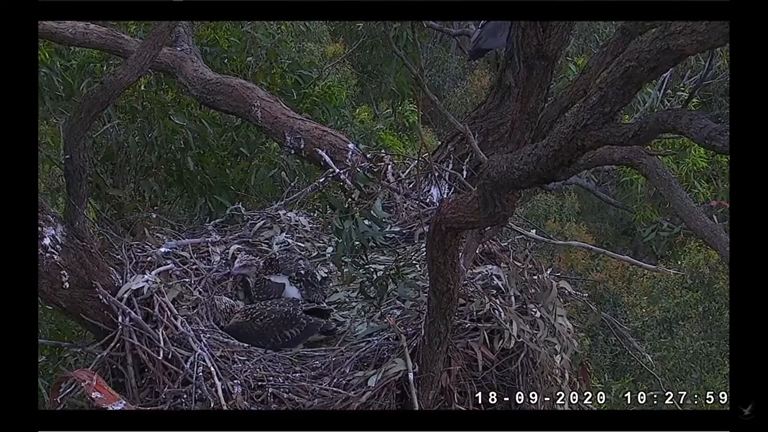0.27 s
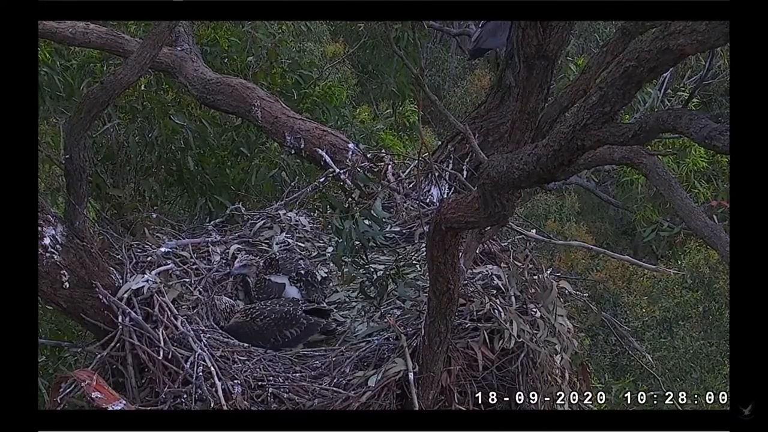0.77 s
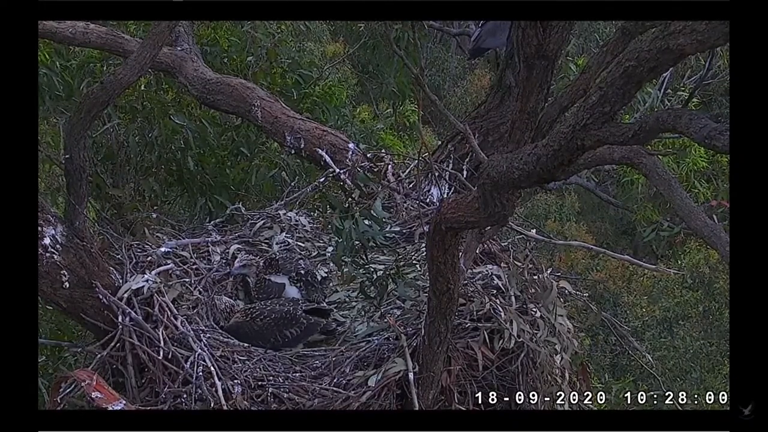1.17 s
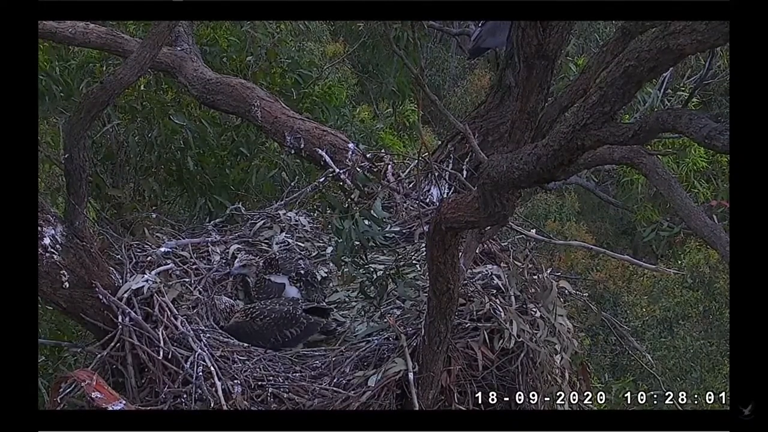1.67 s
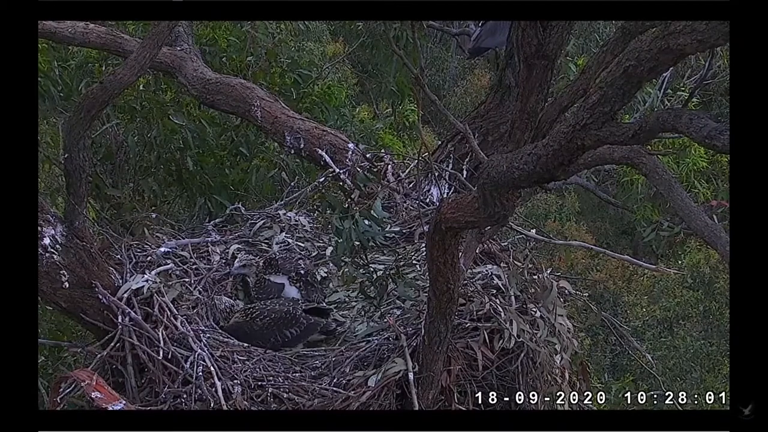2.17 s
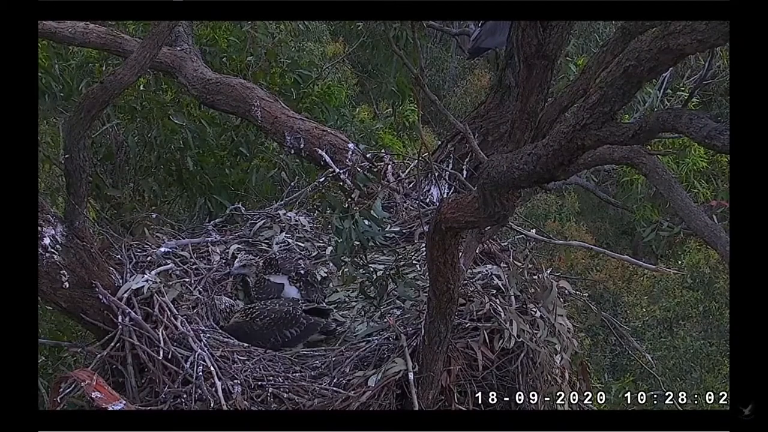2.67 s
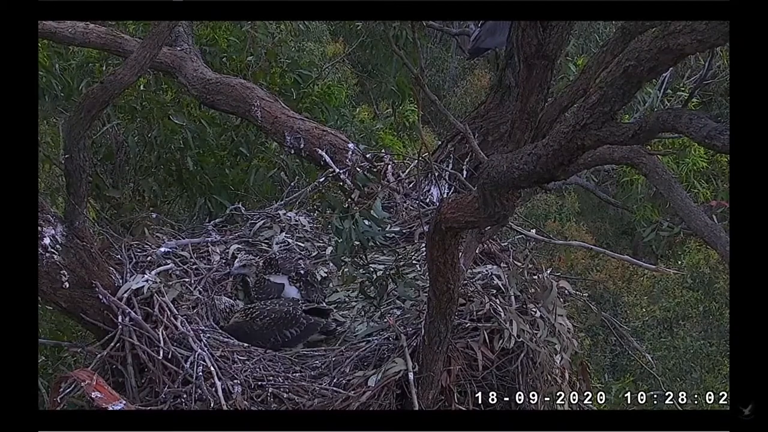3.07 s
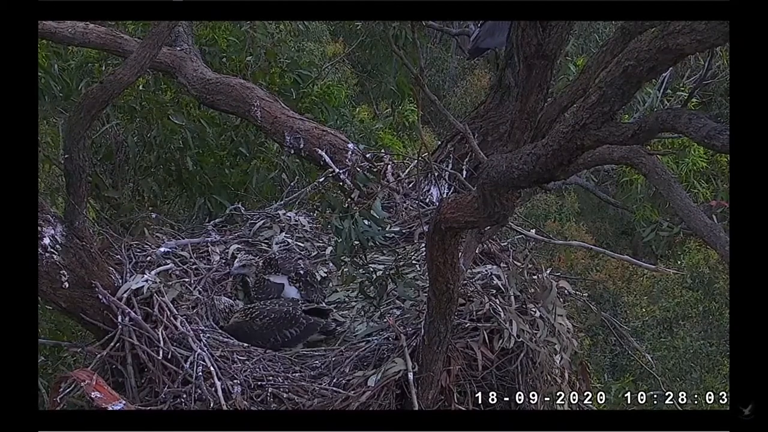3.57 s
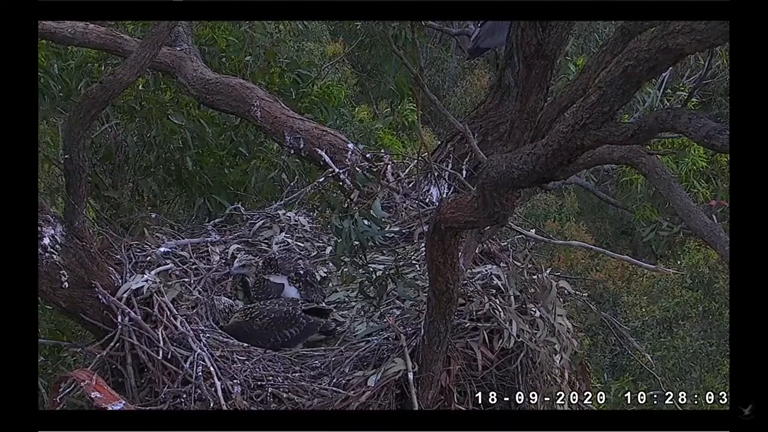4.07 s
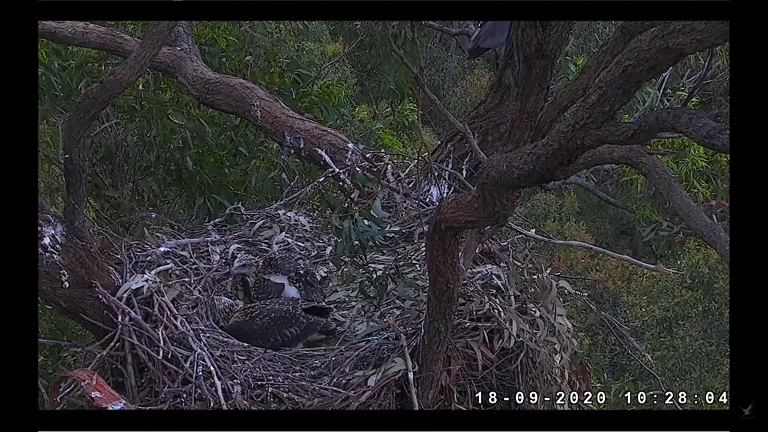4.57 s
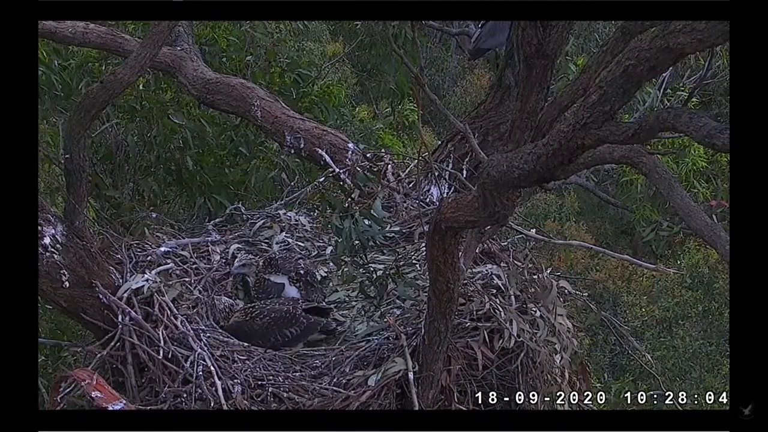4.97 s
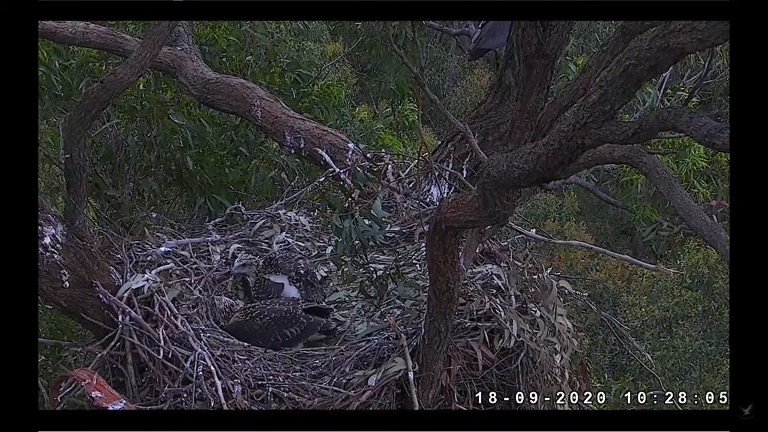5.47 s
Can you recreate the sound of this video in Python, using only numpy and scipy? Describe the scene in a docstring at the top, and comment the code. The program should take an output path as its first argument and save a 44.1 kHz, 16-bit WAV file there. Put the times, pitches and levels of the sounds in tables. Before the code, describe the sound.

Two sea eagles honk a rapid, reedy duet in a forest tree, over a faint low hum and distant murmur.

```python
"""Two sea eagles honk a duet in a forest tree: one quick and higher, one louder and lower with a few squawks.
Each honk is a reedy harmonic stack from the syrinx, arching in pitch and shaped by throat and bill;
a second, lower vibration breaks in at its ends and makes it rasp. The trees return a faint tail
over a low hum, a far drone and a murmur. The nest camera samples at 8 kHz; its spectral images
add a tinny treble."""
import sys
import numpy as np
from scipy import signal
from scipy.fft import rfft, irfft
from scipy.io import wavfile

SR = 44100
rng = np.random.default_rng(int(sys.argv[2]) if len(sys.argv) > 2 else 0)


def generate_wav(signal):
    """Clip the signal to [-1, 1] and save it as 16-bit WAV at the path in sys.argv[1]."""
    frames = np.transpose(np.atleast_2d(signal))
    scaled = np.clip(frames, -1, 1) * 32767
    pcm = np.round(scaled).astype(np.int16)
    wavfile.write(sys.argv[1], SR, pcm)


N = 251370

# higher eagle: start_s, end_s, level_db, top_hz, rasp_factor
HIGH_HONKS = [(.091, 0.169, -25, 424.3, 1.1), (.319, 0.388, -25, 421, 1.1), (0.562, 0.627, -25, 419, 1.6),
              (.775, 0.856, -25.2, 426.6, 1.4), (0.985, 1.073, -24.5, 427.6, .9),
              (1.219, 1.312, -24, 435, 0.76), (1.456, 1.553, -23, 437.8, 1.2),
              (1.714, 1.815, -23.5, 433.6, .6), (1.966, 2.036, -24, 422.5, 1.2),
              (2.269, 2.322, -25.5, 419.4, 2.7), (2.763, 2.838, -24.7, 421.5, .8),
              (2.963, 3.051, -24.5, 429.7, 1.3), (3.177, 3.261, -24.5, 428, 0.88),
              (3.392, 3.485, -25.2, 429.8, 2), (3.625, 3.698, -24.5, 427.7, 0.92),
              (3.856, 3.935, -25, 432.5, 1), (4.077, 4.162, -23.9, 425.5, 0.62),
              (4.312, 4.386, -24, 423, 0.87), (4.548, 4.615, -23.5, 422, 1),
              (4.774, 4.843, -24, 421.8, 1.2), (4.988, 5.068, -24, 422.7, .6),
              (5.203, 5.287, -24.5, 427.3, 3.4), (5.424, 5.505, -24.5, 424.5, 1.5),
              (5.635, 5.732, -24.5, 426, 0.85)]
# lower eagle: start_s, end_s, level_db, top_hz, bright_db, scoop_s, rasp_factor
LOW_HONKS = [(0.439, .553, -17, 388.6, -1, .019, 1.3), (.71, 0.849, -17, 390, -1, .013, 0.9),
             (1.042, 1.177, -17, 387.3, -0.5, .01, .8), (1.404, 1.519, -18, 385.6, 0, .005, .9),
             (2.522, 2.626, -17.5, 386.4, 0, .022, 1.5), (2.782, 2.919, -16, 392.6, -0.5, .015, .9),
             (3.117, 3.232, -17, 390.5, -1.2, .008, 1), (3.454, 3.568, -16.5, 387.8, -0.5, .011, 1.2),
             (5.2, 5.341, -17.5, 389.8, -4, .016, 1.6), (5.512, 5.648, -17, 391.4, -3.5, 0.018, 0.88)]
# lower eagle, two-voiced: start_s, end_s, level_db, top_hz
SQUAWKS = [(1.953, 1.986, -24.5, 380.7), (4.143, 4.187, -27, 377), (4.855, 4.915, -25.5, 384.3)]
# throat and bill response per call type: freq_hz, gain_db
HIGH_THROAT = [(425, -15), (850, -27.5), (1200, -3), (1300, -5.5), (1700, -0.5), (2110, -3), (2520, -28.5),
               (2930, -4.5), (3400, -10.5), (3800, -16), (4000, -27)]
LOW_THROAT = [(380, -17), (770, -18.5), (1110, -8.5), (1170, -8.5), (1490, -2), (1560, 2), (1920, -6),
              (2320, -26.5), (2700, -11.5), (3030, -24.5), (3150, -10), (3470, -4), (3850, -33)]
SQUAWK_THROAT = [(370, -20), (740, -13.5), (1100, -10), (1280, -13.5), (1450, 2), (1560, -1), (1860, -7.5),
                 (2170, -11), (2300, -19.5), (2620, -9.5), (3000, -13.5), (3350, 2), (3800, -28)]
# reflections from trunk and limbs: delay_s, gain_db
LIMB_ECHOES = [(.014, -18), (.027, -20.5), (.078, -41.5)]
# echo of nearby twigs and leaves: freq_hz, t60_s
TWIG_DECAY = [(300, .13), (2000, .18), (3800, 0.17)]
# echo of farther trees: freq_hz, t60_s
TREE_DECAY = [(300, .46), (1200, .9), (2000, 0.67), (3800, 0.73)]
# steady hum tones: pitch_hz, rms_db, waver_hz, throb_db
HUM_TONES = [(25.9, -61.5, 1.5, -0.5), (93.8, -50.5, 0.83, 1.64), (122.4, -66.5, 1.4, 3.5),
             (176, -53, 2.27, 3), (215.7, -58, 3, 6.5), (1131, -60, 1.7, 1)]
# distant murmur spectrum: freq_hz, relative_db
MURMUR_SPECTRUM = [(20, -6), (70, -11), (140, -11), (200, -2.5), (270, -2), (340, -10), (480, -19),
                   (700, -7), (950, -19), (1300, -18), (2000, -28), (3000, -29), (4000, -41)]

# *_share: fraction of the call's length
HIGH_ARCH = dict(climb_hz=35.4, climb_power=2.32, crest_s=.0342, crest_share=.053, sag_hz_per_s2=12100)
LOW_ARCH = dict(climb_hz=21.02, climb_power=1.55, crest_s=.004, crest_share=.6296, sag_hz_per_s2=16500)
SQUAWK_ARCH = dict(climb_hz=25, climb_power=1.8, crest_s=.004, crest_share=.9, sag_hz_per_s2=9000)
HIGH_EFFORT = dict(attack_db=7, attack_s=.0053, swell_db=6.5, swell_share=.5,
                   release_db=29, release_s=.022)
LOW_EFFORT = dict(attack_db=7, attack_s=.0035, swell_db=4.5, swell_share=.6,
                  release_db=20, release_s=.02)
SQUAWK_EFFORT = dict(attack_db=17.5, attack_s=.0022, swell_db=5, swell_share=.46,
                     release_db=5, release_s=.018)
HIGH_RASP = dict(onset=.33, clear_s=.011, held=.027, ending=.75, break_s=.015, spread_s=.002)
LOW_RASP = dict(onset=.18, clear_s=.012, held=.031, ending=.94, break_s=.013, spread_s=.0036)
SQUAWK_RASP = dict(onset=.05, clear_s=.01, held=.5, ending=.79, break_s=.026, spread_s=.0089)


def low_eagle():
    """Long, loud honks; short squawks with a strong second vibration."""
    out = np.zeros(N)
    for start_s, end_s, level_db, top_hz, bright_db, scoop_s, rasp_factor in LOW_HONKS:
        controls = call_controls(end_s - start_s, top_hz, LOW_ARCH, LOW_EFFORT, LOW_RASP, rasp_factor)
        add(out, *honk(start_s, level_db, controls, LOW_THROAT, jitter=.01, breath_db=-13, dulling=.61,
                       sideband_db=-9, undertone_db=-22.5, octave_db=-9.5, second_hz=(320, 260),
                       bright_db=bright_db, scoop_s=scoop_s))
    for start_s, end_s, level_db, top_hz in SQUAWKS:
        controls = call_controls(end_s - start_s, top_hz, SQUAWK_ARCH, SQUAWK_EFFORT, SQUAWK_RASP)
        add(out, *honk(start_s, level_db, controls, SQUAWK_THROAT, jitter=.004, breath_db=-23,
                       dulling=.06, sideband_db=-7.5, undertone_db=-5, octave_db=-7.5,
                       second_hz=(355, 220)))
    return out


def high_eagle():
    """Short, even honks, about four a second."""
    out = np.zeros(N)
    for start_s, end_s, level_db, top_hz, rasp_factor in HIGH_HONKS:
        controls = call_controls(end_s - start_s, top_hz, HIGH_ARCH, HIGH_EFFORT, HIGH_RASP, rasp_factor)
        add(out, *honk(start_s, level_db, controls, HIGH_THROAT, jitter=.007, breath_db=-18, dulling=.3,
                       sideband_db=-1, undertone_db=-22.5, octave_db=4.5, second_hz=(360, 300),
                       scoop_s=.0062, scoop_depth=.022, scoop_db=-3.5))
    return out


def honk(start_s, level_db, controls, throat, jitter, breath_db, dulling, sideband_db, undertone_db,
         octave_db, second_hz, bright_db=0, scoop_s=None, scoop_depth=.1037, scoop_rise_per_s=4.38,
         scoop_db=-2, flip_s=.0017, throat_follow=.68):
    """Syrinx harmonics, rasp sidebands and breath through the throat. Returns onset_s, sound."""
    t, progress, note_hz, swell_db, edges_db, rasp = controls
    bend = np.ones(len(t))
    if scoop_s is not None:  # starts low and weak, climbs, flips up into the note
        scoop = .5 * (1 - np.tanh((t - scoop_s) / flip_s))
        bend = 1 - scoop * (scoop_depth + scoop_rise_per_s * (scoop_s - t))
        edges_db = edges_db + scoop_db * scoop
    effort_db = swell_db + edges_db
    pitch_hz = note_hz * bend * (1 + jitter * (.13 + rasp) * wander(260, len(t)))
    rasp_hz = second_hz[0] + (second_hz[1] - second_hz[0]) * np.maximum(progress, 0) ** 2
    rasp_phase = phase_of(rasp_hz)

    k = np.arange(1, 11)[:, None]
    lookup_hz = k * pitch_hz / bend ** throat_follow  # throat tuned lower during the scoop
    drift_db = .25 * k * np.sin(2 * np.pi * (rng.uniform(4, 14, k.shape) * t + rng.random(k.shape)))
    # weak blowing loses upper harmonics first
    dull_db = dulling * (edges_db + .6 * swell_db) * np.maximum(k - 5, 0)
    tilt = gain_of(drift_db + dull_db + bright_db * (k > 5))
    partials = gain_of(lookup(throat, lookup_hz)) * tilt * bill_closing(progress, lookup_hz)
    phases = k * phase_of(pitch_hz) + throat_phase(throat, k * note_hz)
    voice = (partials * np.cos(phases)).sum(0)

    for side in (-1, 1):
        side_gain = gain_of(lookup(throat, lookup_hz + side * rasp_hz))
        sidebands = np.sqrt(partials * tilt * side_gain) * (k > 1) * np.sin(phases + side * rasp_phase)
        voice += gain_of(sideband_db) * rasp * sidebands.sum(0)
    undertone = np.sin(rasp_phase) + gain_of(octave_db) * np.sin(2 * rasp_phase)
    voice += gain_of(undertone_db - effort_db / 2) * np.sqrt(rasp) * undertone
    voice += gain_of(breath_db) * (.49 + rasp) * noise(throat, len(t))
    harmonic_rms = np.sqrt(np.median((partials ** 2).sum(0)) / 2)
    envelope = gain_of(level_db + effort_db) * signal.windows.tukey(len(t), .05)
    return start_s + t[0], envelope * voice / harmonic_rms


def call_controls(length_s, top_hz, arch, effort, rasp_shape, rasp_factor=1):
    """Curves of one call: t, progress, note_hz, swell_db, edges_db, rasp (0-1)."""
    t = np.arange(-.005, length_s + .004, 1 / SR)  # air flows just before and after the note
    note_hz = top_hz - pitch_drop_hz(t, length_s, **arch)
    swell_db, edges_db = blowing_db(t, length_s, **effort)
    rasp = np.clip(rasp_factor * rasping(t, length_s, **rasp_shape), 0, 1)
    return t, t / length_s, note_hz, swell_db, edges_db, rasp


def pitch_drop_hz(t, length_s, climb_hz, climb_power, crest_s, crest_share, sag_hz_per_s2):
    """Distance below top pitch: climb to a crest, then a quickening sag."""
    peak_s = crest_s + crest_share * length_s
    climb = climb_hz * np.clip(1 - t / peak_s, 0, 1) ** climb_power
    return climb + sag_hz_per_s2 * np.maximum(t - peak_s, 0) ** 2


def blowing_db(t, length_s, attack_db, attack_s, swell_db, swell_share, release_db, release_s):
    """Level re full effort: gentle swell; quick attack plus steepening release."""
    swell = swell_db * (t / length_s / swell_share - 1) ** 2
    attack = attack_db * 2 / (1 + np.exp(1.15 * t / attack_s))
    release = release_db * np.maximum(1 + (t - length_s) / release_s, 0) ** 2.86
    return -swell, -attack - release


def rasping(t, length_s, onset, clear_s, held, ending, break_s, spread_s):
    """Strength of the second vibration, which takes hold at low air pressure: onset and ending."""
    clearing = onset * np.exp(-np.maximum(t, 0) / clear_s)
    breaking = ending * .5 * (1 + np.tanh((t - length_s + break_s) / spread_s))
    return held + clearing + breaking


def bill_closing(progress, hz):
    """Gain as the bill shuts: the 1.3 kHz resonance fades first, the 2 kHz one last."""
    shut = np.clip((progress - .7) / .18, 0, 1)
    lift_db = 3.3 * np.exp(-((hz - 2020) / 260) ** 2)
    cut_db = 4.7 * np.exp(-((hz - 1300) / 330) ** 2)
    return gain_of(shut * (lift_db - cut_db))


def throat_phase(throat, hz, size=4096):
    """Minimum phase: the throat rings after each pulse."""
    grid_hz = np.fft.fftfreq(size, 1 / SR)
    phase = -signal.hilbert(np.log(gain_of(lookup(throat, grid_hz)))).imag
    return np.interp(hz, grid_hz[:size // 2], phase[:size // 2])


def forest_echo(calls, twigs_db=-21, trees_db=-29, highpass_hz=1500, trees_delay_s=.05):
    """Limb reflections, short twig echo, long faint tail from farther trees."""
    near = gain_of(twigs_db) * scatter(TWIG_DECAY)
    for delay_s, gain_db in LIMB_ECHOES:
        add(near, delay_s, gain_of([gain_db]))
    # thin wood reflects only short waves
    response = signal.sosfilt(signal.butter(2, highpass_hz, "high", fs=SR, output="sos"), near)
    add(response, trees_delay_s, gain_of(trees_db) * scatter(TREE_DECAY))
    return signal.fftconvolve(calls, response)[:N]


def scatter(decay, echoes_per_s=2000):
    """Sparse echoes of random sign, decaying per band; unit energy."""
    taps = rng.choice([-1., 1.], SR) * (rng.random(SR) < echoes_per_s / SR)
    hz, t, bands = signal.stft(taps, SR, nperseg=256)
    fade = gain_of(-60 * t / lookup(decay, hz)[:, None])
    _, tail = signal.istft(bands * fade, SR, nperseg=256)
    return tail / np.linalg.norm(tail)


def hum():
    """Steady tones, mostly low."""
    return sum(wavering_tone(*tone) for tone in HUM_TONES)


def drone(from_hz=266, to_hz=228, settle_s=2.1, start_db=-48, fade_db_per_s=.75):
    """Far-off tone that sinks, settles and fades a little."""
    t = np.arange(N) / SR
    pitch_hz = to_hz + (from_hz - to_hz) * np.exp(-t / settle_s)
    return wavering_tone(pitch_hz, start_db - fade_db_per_s * t, waver_hz=8, throb_db=3.5)


def murmur(level_db=-45, swell_db=1.6):
    """Dull, gently fluctuating wash of the distant surroundings."""
    return gain_of(level_db + swell_db * wander(14, N)) * noise(MURMUR_SPECTRUM, N)


def wavering_tone(pitch_hz, rms_db, waver_hz, throb_db):
    """Sine with random drift in pitch and level."""
    phase = phase_of(pitch_hz + waver_hz * wander(9.34, N))
    return gain_of(rms_db + throb_db * wander(5.4, N)) * np.sqrt(2) * np.sin(phase)


def noise(spectrum, count):
    """Shaped noise, rms 1."""
    gain = gain_of(lookup(spectrum, np.fft.rfftfreq(count, 1 / SR)))
    shaped = irfft(rfft(rng.standard_normal(count)) * gain, count)
    return shaped / np.sqrt(np.mean(shaped ** 2) + 1e-20)


def wander(rate_hz, count):
    """Smooth random curve up to about rate_hz, rms near 1."""
    position = np.arange(count) * 2 * rate_hz / SR
    knots = rng.standard_normal(2000)
    i = position.astype(int) % (len(knots) - 1)
    fraction = position % 1
    return knots[i] + (knots[i + 1] - knots[i]) * fraction ** 2 * (3 - 2 * fraction)


def lookup(table, hz):
    """Interpolation on a log-frequency axis."""
    freq_hz, values = np.transpose(table)
    return np.interp(np.log(abs(hz) + 1), np.log(freq_hz + 1), values)


def phase_of(hz):
    """Running phase in radians."""
    return 2 * np.pi * np.cumsum(hz) / SR


def gain_of(db):
    """Decibels to amplitude."""
    return 10 ** (np.asarray(db) / 20)


def add(mix, start_s, sound):
    """Mixes a sound in at start_s."""
    part = mix[round(start_s * SR):][:len(sound)]
    part += sound[:len(part)]


def scene():
    """Eagles, echoes and background at one microphone."""
    eagles = high_eagle() + low_eagle()
    return np.tile(eagles + forest_echo(eagles) + murmur() + hum() + drone(), (2, 1))


def record(dry, camera_hz=8000, lowpass_hz=15150, dc_offset=.0083):
    """Mono camera sampling; linear interpolation mirrors the honks into the treble."""
    count = round(N * camera_hz / SR)
    samples = signal.resample(dry[0] * signal.windows.tukey(N, .001), count)
    fine_grid = np.arange(4 * N) * count / (4 * N)  # 4x oversampled
    imaged = signal.resample(np.interp(fine_grid, np.arange(count), samples), N)
    lowpass = signal.firwin(511, lowpass_hz, window=("kaiser", 9), fs=SR)
    return np.tile(dc_offset + signal.oaconvolve(imaged, lowpass, "same"), (2, 1))


dry = scene()
out = record(dry)
generate_wav(out)
```